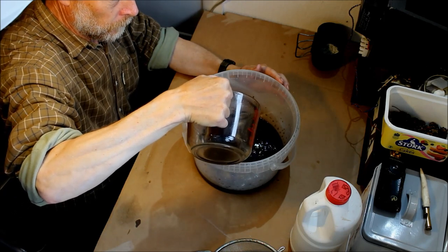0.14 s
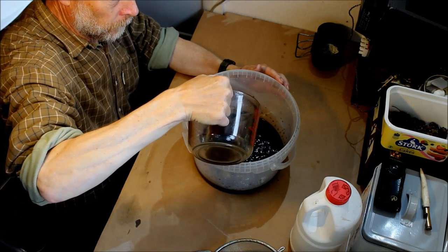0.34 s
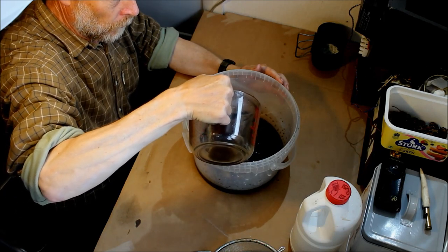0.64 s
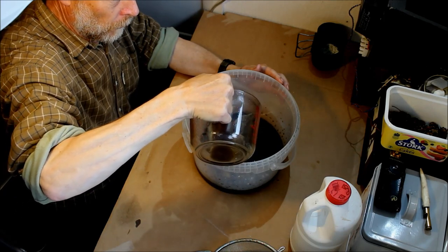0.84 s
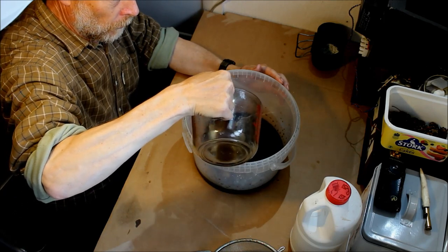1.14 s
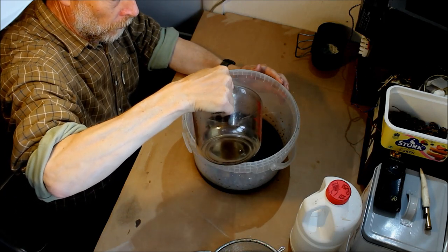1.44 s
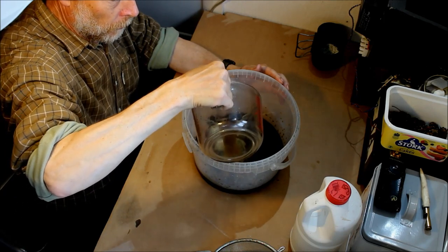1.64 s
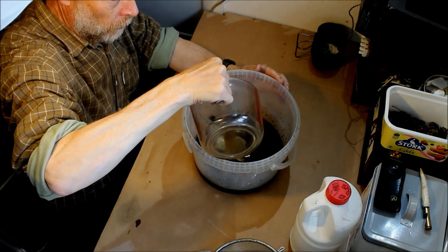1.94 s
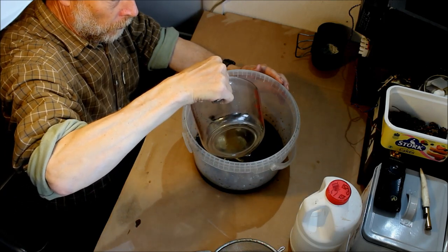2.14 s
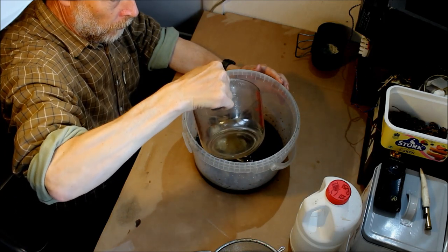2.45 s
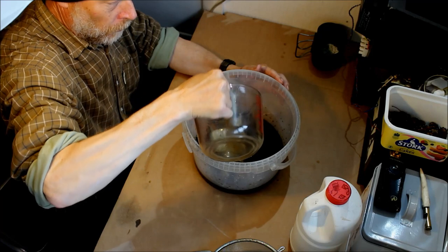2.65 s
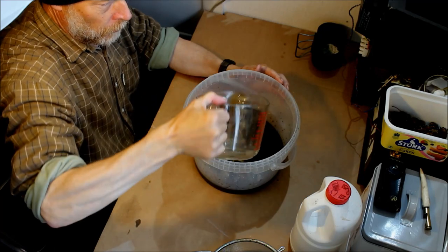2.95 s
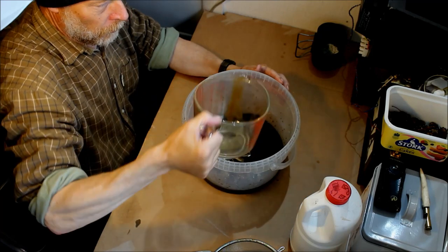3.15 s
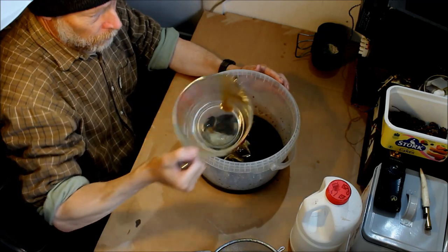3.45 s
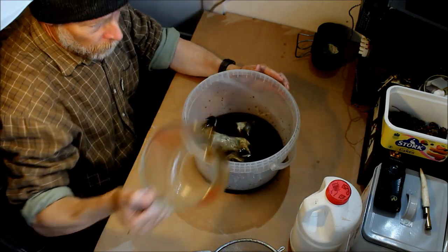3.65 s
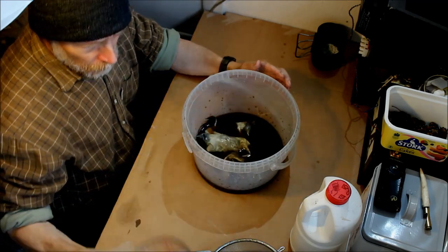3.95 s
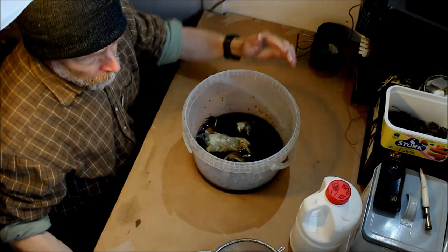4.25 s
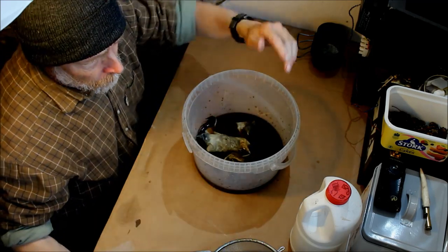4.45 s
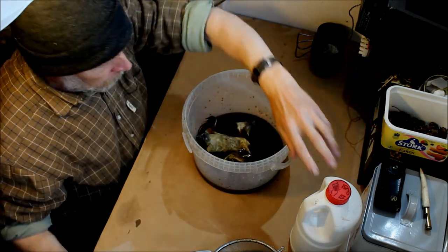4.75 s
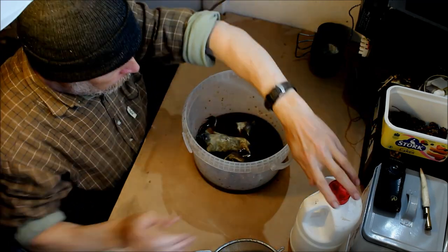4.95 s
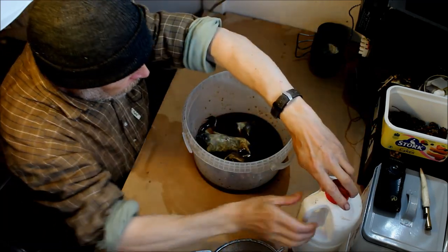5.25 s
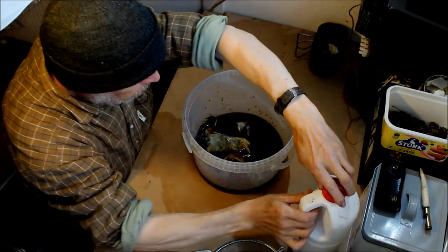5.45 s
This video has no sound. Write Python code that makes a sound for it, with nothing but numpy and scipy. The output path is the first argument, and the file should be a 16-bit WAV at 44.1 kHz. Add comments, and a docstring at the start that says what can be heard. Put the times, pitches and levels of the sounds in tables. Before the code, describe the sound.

Liquid splashes from a glass jug into a plastic bucket and thins to drips, followed by knocks on a workbench.

```python
"""A workbench in a small room. Liquid runs from a glass jug into a plastic bucket: a stream of ringing
bubbles that thins to single drips. The jug knocks the bucket, a hand slides off it, and the jug is set
down and sings; the bench rings low and sways. Fingers rub and tap a plastic bottle. Steady hiss and a
throbbing hum lie behind, all heard through a camera microphone with gain control."""
import sys
import numpy as np
from scipy import signal
from scipy.fft import rfft, irfft
from scipy.io import wavfile
from scipy.ndimage import uniform_filter1d

SR = 44100
rng = np.random.default_rng(int(sys.argv[2]) if len(sys.argv) > 2 else 0)


def transcribe(u):
    """Save the signal u as a 16-bit wav file named by the first command-line argument.

    u: samples, shape (n,) or (channels, n), limited to [-1, 1]; the rate is SR.
    q: integer samples, one column per channel.
    """
    v = np.clip(np.atleast_2d(u).T, -1, 1)
    q = np.round(v * 32767).astype(np.int16)
    wavfile.write(sys.argv[1], SR, q)


N = 247401


def amp(db):
    """Gain of a level in dB."""
    return 10 ** (np.asarray(db) / 20)


def unit_rms(x):
    """Scaled to rms 1."""
    return x / np.sqrt(np.mean(x ** 2) + 1e-20)


def add(mix, start_s, sound):
    """Mixes a sound in at start_s."""
    part = mix[round(start_s * SR):][:len(sound)]
    part += sound[:len(part)]


def butter(x, order, edges_hz, kind):
    """Causal Butterworth filter."""
    return signal.sosfilt(signal.butter(order, edges_hz, kind, fs=SR, output="sos"), x)


def resonate(x, hz, width_hz):
    """Resonator, peak gain 1."""
    pole = np.exp((2j * np.pi * hz - np.pi * width_hz) / SR)
    return 2 * signal.lfilter([1 - abs(pole)], [1, -pole], x).real


def coloured(x, spectrum):
    """Shaped by (f/Hz, level/dB) points on a log-frequency axis, rms 1."""
    hz, db = np.transpose(spectrum)
    bins_hz = np.fft.rfftfreq(len(x), 1 / SR)
    gain = amp(np.interp(np.log(bins_hz + 1), np.log(hz), db))
    return unit_rms(irfft(rfft(x) * gain, len(x)))


def mode(t, hz, db, t60_s):
    """Damped sine."""
    return amp(db - 60 * t / t60_s) * np.sin(2 * np.pi * hz * t)


def burst(noise, lo_hz, hi_hz, t60_s, rise_s):
    """Band noise with a fast rise and exponential decay."""
    t = np.arange(len(noise)) / SR
    band = unit_rms(butter(noise, 2, [lo_hz, hi_hz], "band"))
    return band * (1 - np.exp(-t / rise_s)) * amp(-60 * t / t60_s)


def echoes(x, t60_s, delay_s, step=20):
    """Decaying reflections of random sign, one per step samples; response energy 1."""
    slots = np.arange(round(delay_s * SR), SR // 2, step)
    response = np.zeros(SR // 2 + step)
    response[slots + rng.integers(0, step, len(slots))] = rng.choice([-1., 1.], len(slots))
    response *= amp(-60 * np.arange(len(response)) / SR / t60_s)
    return signal.oaconvolve(x, response / np.linalg.norm(response))[:N]


def bubble(hz, decay_cycles, glide=0.041):
    """Trapped air rings up fast, then dies as its pitch climbs; peak 1."""
    age = np.arange(int(5 * decay_cycles * SR / hz)) * hz / SR / decay_cycles
    envelope = (1 - np.exp(-age / 0.16)) * np.exp(-age)
    tone = envelope * np.sin(2 * np.pi * decay_cycles * (age + glide * age ** 2 / 2))
    return tone / abs(tone).max()


def bubble_string(hz, decay_cycles, jitter, gap_s=0.0025):
    """A weak first bubble, the main one, then fainter ones near the same size."""
    out = np.zeros(SR // 20)
    for k, (db, (shift, detune, swell)) in enumerate(zip([-12, -5, -10, -15, -20], jitter)):
        tone = bubble(hz * (1 + 0.1 * detune), decay_cycles)
        add(out, gap_s * (k + 0.4625 + 0.4 * shift), amp(db + 0.51 * swell) * tone)
    return out


# Pour: t/s, flow/dB, large bubbles re flow/dB
FLOW = [(0.0, -34.5, -10.5), (0.3, -35.5, -4), (0.5, -34.5, -4), (0.65, -30, -9), (0.9, -35.5, -5.5),
        (1.13, -35, -9.5), (1.25, -35.5, -15), (1.4, -45, -12), (1.59, -56.5, -6), (1.78, -45.5, -28),
        (2.04, -63, 11), (2.3, -77, 4)]
# Large bubbles, small bubbles, spray: f_lo/Hz, f_hi/Hz, rate/(1/s), decay/cycles, spread/dB
BUBBLE_SIZES = [(950, 1660, 1100, 3.3, 4), (2286, 7400, 5000, 3.6, 5.5), (6800, 13250, 2200, 4.3, 5.5)]
def stream(pitches=14):
    """Random bubbles in three size classes, a few loud; the spray thins more slowly than the flow."""
    times_s, flow_db, large_db = np.transpose(FLOW)
    levels_db = flow_db + large_db, flow_db, -10.5 + 0.67 * flow_db
    out, t = np.zeros(N), np.arange(round(times_s[-1] * SR)) / SR
    for db, (lo_hz, hi_hz, per_s, decay_cycles, spread_db) in zip(levels_db, BUBBLE_SIZES):
        chance, pitch, strength = rng.random((3, len(t)))
        births = (chance < per_s / SR) * amp(spread_db * np.minimum(-np.log(strength), 4.5))
        pitch_index = (pitch * pitches).astype(int)
        layer = sum(signal.oaconvolve(births * (pitch_index == k), bubble(hz, decay_cycles))[:len(t)]
                    for k, hz in enumerate(np.geomspace(lo_hz, hi_hz, pitches)))
        add(out, 0, unit_rms(layer) * amp(np.interp(t, times_s, db)))
    return out


# Loud drops: t/s, level/dB, bubble f/Hz, spray re level/dB, splash re level/dB, decay/cycles
DROPS = [(0.0094, -10, 6050, -20, -8, 3.2), (0.0524, -16, 4960, -16, -10, 4.6),
         (0.0615, 4.5, 5100, -22, -11, 5.4), (0.092, -17, 3208, -24, -8, 4.2),
         (0.1185, -2, 4490, -34, -9, 3), (0.1361, -7.5, 2540, -18, 1, 3.2),
         (0.1424, -7.5, 8600, -6.5, -5, 3.6), (0.1644, -16, 3430, -6, -8, 3.9),
         (0.188, -12.5, 5340, -25, -11, 4.2), (0.207, -8.5, 3100, -13, 4.5, 2.5),
         (0.2269, -11, 5760, -17, -12, 4.7), (0.2544, -25, 3190, 0, -8, 4.17),
         (0.2747, -9.5, 6000, -14, -14, 4.9), (0.3012, -10.5, 4700, -12, -2, 3.7),
         (0.3314, -4, 10800, -25, -12, 4.2), (0.3496, -9, 3460, -10.5, -7, 4.2),
         (0.3935, -12, 6230, -20, -8, 4.2), (0.405, -16, 3260, -1, -3, 3.6),
         (0.4212, -12, 2640, -9, 2.5, 3.9), (0.4394, -10.5, 2520, -9, -4, 3.7),
         (0.4733, -16.5, 3320, -20, 9, 3.18), (0.4954, -7.5, 5800, -17, -11, 4.2),
         (0.5172, -1, 5330, -33, -10, 6.1), (0.547, -15, 3760, -11, -10, 4.2),
         (0.5563, -4.5, 7700, -15, -10, 6.1), (0.596, -16, 5800, -11, -11, 3.8),
         (0.6017, -13, 4900, -21, -8, 4.2), (0.6182, -10, 6200, -9, -8, 5.2),
         (0.6382, -2, 5820, -10, -3, 4.2), (0.6668, -1.5, 6404, -28, -17, 4.8),
         (0.684, -10, 7240, -24, -6, 4.2), (0.7023, -14.5, 3240, -22, -1, 4.2),
         (0.725, -12.5, 6660, -18, -12, 5), (0.755, -13, 3240, -9, -15, 4),
         (0.7624, -15, 3770, -18, -11, 4.2), (0.7891, -5, 5980, -21, -8, 7.3),
         (0.823, -10, 4830, -19, -8, 3.2), (0.832, -9, 3600, -15, 0, 3.4),
         (0.8724, -14.5, 3480, -7, -6, 4.2), (0.8799, -13.5, 3700, -3, -15, 5.1),
         (0.8969, -6.5, 3200, -10, -6, 4.6), (0.922, -12, 6000, -6, -5, 3.8),
         (0.94, -3.5, 6000, -24, 6, 3.5), (0.9685, -4, 4280, -17, -17, 5.7),
         (0.9941, -11, 2640, -14, -8, 3.7), (1.029, -26, 5990, 0, -14, 4.2),
         (1.066, -5, 5870, -12, -11, 3.8), (1.089, -11, 5900, -9, -10, 3.7),
         (1.1014, -8, 5980, -13.5, 1, 3.8), (1.1286, -12.5, 5700, -22, 6, 3.9),
         (1.1747, 5.5, 5980, -43, -12, 3.6), (1.243, -8, 6300, -10, -13, 5),
         (1.2866, -13, 5270, -16, -13, 4.2), (1.3177, -9, 4000, -22, -1.5, 3.4),
         (1.3218, -6.5, 5830, -33, -14, 5.6), (1.3745, -7, 8300, -20, -10, 4.9),
         (1.406, -15, 5900, -24, -5, 4.9), (1.4556, -19, 3100, -28, -12, 4.2),
         (1.5303, -13, 3770, -24, -5, 4.2), (1.5614, -27.5, 3740, -5, -8, 4.2),
         (1.595, -12, 4570, -13, -3, 3.7), (1.6057, -12.5, 5370, -16, -8, 4.7),
         (1.6474, -17, 6200, -12, -8, 4.2), (1.6546, -11, 5980, -15, 7.5, 2.2),
         (1.684, -10, 10300, -18, -8, 4.7), (1.713, -17.5, 5750, -9.5, 9.5, 3),
         (1.748, -9, 5980, -25, -16, 4.2), (1.7651, -2, 5980, -15, -26, 4.9),
         (1.7998, -4.5, 9800, -20, -17, 4.2), (1.8244, -14, 3770, -10, -14, 5),
         (1.8432, -7.5, 7660, -21, -9, 5.7), (1.8722, -6, 5980, -15.5, -14, 3.6),
         (1.922, -17.5, 3360, -8.5, -1, 4.2), (1.943, -22, 9790, -12, -8, 4.2),
         (1.9944, -12, 3770, -17.5, -2, 4.4), (2.0334, -24.5, 7610, -17, -10, 5.1),
         (2.0604, -33, 6260, -7, -8, 4.2), (2.0812, -26, 5800, -10, -8, 3.5),
         (2.1001, -22, 6020, -13, -2, 4.8), (2.1652, -32.5, 2500, -15, -13, 4.2),
         (2.1966, -27, 9380, -19, -8, 5.1), (2.2583, -25, 6100, -17, -17, 5.5),
         (2.3906, -33, 5430, -5.5, -10, 4.2), (2.4858, -8, 10200, -27, -11.5, 6.3)]
def drops():
    """Each drop traps a string of bubbles, with a broad splash and a fine spray."""
    out = np.zeros(N)
    noises = rng.standard_normal((len(DROPS), 2, 2500))
    jitters = rng.uniform(-1, 1, (len(DROPS), 5, 3))
    for (at_s, db, hz, spray_db, splash_db, decay_cycles), noise, jitter in zip(DROPS, noises, jitters):
        splash = burst(noise[0], 0.53 * hz, 1.72 * hz, t60_s=0.018, rise_s=0.0046)
        spray = burst(noise[1], 6000, 12400, t60_s=0.036, rise_s=0.00033)
        add(out, at_s - 0.002, amp(db) * bubble_string(hz, decay_cycles, jitter))
        add(out, at_s, amp(db + splash_db) * splash + amp(db + spray_db) * spray)
    return out


# Large air pockets: t/s, level/dB, f/Hz
GULPS = [(0.043, -17, 1790), (0.09, -19, 2510), (0.118, -23, 1390), (0.136, -16, 2540),
         (0.205, -15.5, 1200), (0.238, -20, 1450), (0.273, -21, 1221), (0.344, -13, 1210),
         (0.378, -14, 1580), (0.422, -26, 2510), (0.441, -29, 2542), (0.475, -24, 2540),
         (0.496, -15.5, 1080), (0.547, -19, 1230), (0.594, -23, 2510), (0.676, -17.5, 1210),
         (0.729, -19.5, 1370), (0.767, -21, 1440), (0.794, -20, 1450), (0.856, -19, 2510),
         (0.887, -17, 1320), (0.917, -19, 1250), (0.932, -21, 1450), (0.95, -11.5, 2510), (0.97, -5, 2610),
         (0.995, -31, 2574), (1.032, -31, 1100), (1.121, -22, 1200), (1.151, -18, 1140),
         (1.244, -15.5, 2510), (1.313, -21.5, 2190), (1.596, -22, 2530), (1.713, -22, 2450),
         (1.734, -23, 2420), (1.813, -30.5, 1060), (1.993, -25, 1440)]
def gulps(decay_cycles=3.14, plop_db=4, plop_db_per_khz=-6.11):
    """Each pocket breaks into low bubbles with a dull plop; smaller, higher ones plop less."""
    out = np.zeros(N)
    noises = rng.standard_normal((len(GULPS), 2500))
    jitters = rng.uniform(-1, 1, (len(GULPS), 5, 3))
    for (at_s, db, hz), noise, jitter in zip(GULPS, noises, jitters):
        plop = burst(noise, 770, 1730, t60_s=0.043, rise_s=0.0029)
        add(out, at_s - 0.002, amp(db) * bubble_string(hz, decay_cycles, jitter))
        add(out, at_s, amp(db + plop_db + plop_db_per_khz * hz / 1000) * plop)
    return out


def drumming():
    """The stream drums softly on the bucket's bottom, following the flow."""
    times_s, flow_db, _ = np.transpose(FLOW)
    drive_db = np.interp(np.arange(N) / SR, times_s, flow_db, right=-200)
    murmur = unit_rms(butter(rng.standard_normal(N), 2, [90, 600], "band"))
    return murmur * amp(-39 + 0.36 * drive_db)


# Bucket air and wall resonances: f/Hz, width/Hz, gain/dB
BUCKET_MODES = [(954, 15.3, 5.5), (1200, 160, -7.5), (1440, 41, 0), (2510, 87, -2.5), (3226, 27, 5.5),
                (3770, 230, -5.5), (4900, 1090, -1.5), (5980, 306, 2), (7250, 20, -48), (8300, 59, -9)]
def bucket(liquid):
    """The walls reflect each splash and the resonances hold it; little escapes below the lowest."""
    inside = liquid + amp(-5.5) * echoes(liquid, t60_s=0.07, delay_s=0.002)
    ringing = sum(amp(db) * resonate(inside, hz, width_hz) for hz, width_hz, db in BUCKET_MODES)
    return butter(0.47 * inside + ringing, 6, 870, "high")


# Modes of bench and bucket, grouped as thud, board, bucket wall, tick: f/Hz, level/dB, t60/s
BENCH_MODES = [
    [(79, -22, 0.5), (116.3, 7.5, 0.083)],
    [(170.5, -3.5, 0.19), (223, -8.5, 0.13), (250.6, -3, 0.23), (254, -7.5, 0.086)],
    [(75.3, -12, 0.61), (289, 7, 0.035), (318.7, -8.5, 0.23), (578, -13, 0.044), (655, -1.5, 0.036),
     (948, -5.5, 0.048), (1035, 7, 0.014)],
    [(1433, 2, 0.027), (1526, -5.5, 0.025), (1910, -16, 0.032)],
]
# Contacts: t/s, thud/dB, board/dB, wall/dB, tick/dB, crack/dB, crack f/Hz, crack t60/s
KNOCKS = [(2.8963, -43, -8.5, -10, -21, -13, 2550, 0.053), (2.9157, -27, -8.5, -2.5, -11, -16, 3400, 0.027),
          (4.2380, -60, -50, -42, -47, -32.5, 5560, 0.081),
          (4.4768, -9.5, -3, -15.5, -7.5, -16.5, 3500, 0.078),
          (4.6190, -12, -5, -15, -11, -23.5, 2920, 0.17), (4.6875, -40, -44, -34, -39, -21, 4630, 0.17),
          (4.6917, -43, -38, -13.5, -14, -12.5, 4670, 0.052),
          (4.6945, 0.5, -15.5, -36, -46, -40, 4000, .05), (4.7273, -46, -46, -22, -22, -4, 8600, 0.026),
          (4.7297, -47, -42, -41, -49, -5, 8400, 0.036), (4.759, -38, -53, -51, -45, -21, 6360, .12),
          (4.836, -34, -35, -58, -56, -28.5, 10000, 0.029), (5.259, -58, -57, -56, -54, -35.5, 3240, 0.065),
          (5.3190, -27, -50, -51, -38, -36, 3950, 0.15), (5.3427, -49, -38, -36, -43, -14, 3700, 0.059),
          (5.355, -24, -38, -32.5, -28, -29, 4500, 0.094)]
def knocks():
    """Each hard contact cracks and rings the four mode groups."""
    out, t = np.zeros(N), np.arange(SR // 2) / SR
    rings = [sum(mode(t, hz, db, t60_s) * (1 - np.exp(-t * hz / 0.41)) for hz, db, t60_s in group)
             for group in BENCH_MODES]
    rings[1:] = butter(rings[1:], 2, 110, "high")  # a short contact hardly moves the whole bench
    for at_s, *groups_db, crack_db, crack_hz, t60_s in KNOCKS:
        noise = rng.standard_normal(6000)
        crack = burst(noise, 0.48 * crack_hz, 1.46 * crack_hz, t60_s, rise_s=2.2 / crack_hz)
        add(out, at_s, sum(amp(db) * ring for db, ring in zip(groups_db, rings)))
        add(out, at_s, amp(crack_db) * crack)
    return out


def jug(at_s=4.778):
    """The glass sings one thin tone after it is set down."""
    out, t = np.zeros(N), np.arange(SR // 2) / SR
    add(out, at_s, mode(t, hz=1433, db=-33, t60_s=1.1) * signal.windows.tukey(len(t), 0.05))
    return out


# Bench swings under the microphone: t/s, length/s, level/dB, f/Hz
SWINGS = [(2.94, 0.23, -33, 45), (3.156, .1, -46, 45.3), (4.493, 0.14, -28, 35), (4.712, 0.14, -15, 41),
          (4.822, 0.1, -19.5, 41), (4.959, 0.069, -30, 41.3), (5.034, 0.12, -26.5, 41.6),
          (5.127, 0.18, -34, 43), (5.39, .14, -48, 41)]
def bench_sway(rise_share=0.36, fall_share=0.34, fade_db=-9):
    """Each swing is a deep tone that swells, fades and stops, over uneven rocking."""
    out = np.zeros(N)
    for at_s, length_s, db, hz in SWINGS:
        t = np.arange(0, length_s, 1 / SR)
        progress = t / length_s
        ramp = np.clip(np.minimum(progress / rise_share, (1 - progress) / fall_share), 0, 1)
        envelope = np.sin(np.pi / 2 * ramp) ** 2 * amp(db + fade_db * progress)
        rocking = unit_rms(resonate(rng.standard_normal(len(t)), hz=31.7, width_hz=4.9))
        add(out, at_s, np.sqrt(2) * envelope * (np.sin(2 * np.pi * hz * t) + 0.27 * rocking))
    return out


# Envelope per stroke: t/s, level/dB
RUB_STROKES = [
    [(4.775, -33), (4.83, -42.5), (4.87, -52)],
    [(4.9, -56), (5.25, -51.5), (5.31, -54)],
    [(5.375, -32.5), (5.411, -36), (5.451, -30), (5.529, -37), (5.557, -36), (5.585, -22), (5.61, -33)],
]
# Spectrum per stroke: f/Hz, relative density/dB
RUB_SPECTRA = [
    [(880, -34), (1500, -1), (2140, -22), (2340, -6), (3780, -6), (5350, 1), (15000, -31)],
    [(350, -29), (600, -5), (715, -18), (818, -3), (887, -3), (4340, 0), (15000, -20)],
    [(180, -47), (300, -15), (523, -2.5), (587, -10), (658, -4.5), (1150, -6.5), (1290, -10.5), (3920, -6),
     (15000, -26)],
]
def bottle_rubs(spread_db=2):
    """Fingers make dense tiny slips of uneven size, coloured by the surface."""
    out = np.zeros(N)
    for stroke, spectrum in zip(RUB_STROKES, RUB_SPECTRA):
        times_s, db = np.transpose(stroke)
        t = np.arange(times_s[0], times_s[-1], 1 / SR)
        friction = rng.standard_normal(len(t))
        roughness = unit_rms(uniform_filter1d(rng.standard_normal(len(t)), 60))
        slips = coloured(friction * amp(spread_db * roughness), spectrum)
        add(out, times_s[0], slips * amp(np.interp(t, times_s, db)))
    return out


# Plastic bottle modes: f/Hz, level/dB, t60/s
BOTTLE_MODES = [(122.4, -7, 0.5), (159, 0, 0.061), (502, -8.5, 0.25), (742, -6.5, 0.057),
                (1100, -14, 0.058), (3030, -23, 0.029), (3650, -7, 0.025), (4100, -7, 0.027),
                (5670, -10, 0.038)]
# Finger taps: t/s, level/dB
TAPS = [(5.26, -59), (5.3192, -31), (5.3445, -20), (5.3572, -14.5)]
def bottle_taps():
    """Each tap rings the hollow bottle; the modes alternate in sign."""
    out, t = np.zeros(N), np.arange(SR // 4) / SR
    ring = sum((-1) ** k * mode(t, hz, db, t60_s) for k, (hz, db, t60_s) in enumerate(BOTTLE_MODES))
    for at_s, db in TAPS:
        add(out, at_s, amp(db) * ring)
    return out


# Slide envelope: t/s, level/dB
SLIDE = [(4.001, -55), (4.092, -54.5), (4.294, -43), (4.42, -40.5), (4.538, -37), (4.62, -44)]
# Rubbed wall resonances: f/Hz, width/Hz, relative level/dB
WALL_MODES = [(1210, 44, 3.5), (1450, 52, -11), (1480, 1600, 2), (2190, 67, -12), (2510, 69, -8),
              (2830, 74, -23)]
def hand_slide():
    """Soft friction of a hand, sounding through the bucket's wall."""
    out = np.zeros(N)
    times_s, slide_db = np.transpose(SLIDE)
    t = np.arange(times_s[0], times_s[-1], 1 / SR)
    friction = rng.standard_normal(len(t))
    wall = sum(amp(db) * unit_rms(resonate(friction, hz, width_hz)) for hz, width_hz, db in WALL_MODES)
    add(out, times_s[0], unit_rms(wall) * amp(np.interp(t, times_s, slide_db)))
    return out


def room(x):
    """Short tail; thin walls let the bass out and absorb the top."""
    return amp(-11) * butter(echoes(x, t60_s=0.18, delay_s=0.006), 2, [280, 8000], "band")


# Room hiss: f/Hz, relative density/dB
HISS_SPECTRUM = [(12, -39), (20, -8), (38, -10.5), (98, -6), (221, -8), (261, -8), (355, -12), (396, -3),
                 (456, -24.5), (510, -10), (1020, -18), (1600, -19), (3040, -23.5), (4250, -23.5),
                 (15800, -30)]
def background(throb_hz=11.5, rumble_hz=48, rumble_width_hz=17):
    """A fuzzy throbbing hum, low rumble and steady hiss."""
    throb = (1 + np.cos(2 * np.pi * throb_hz * np.arange(N) / SR + 3.77)) ** 2
    hum = unit_rms(throb * resonate(rng.standard_normal(N), hz=396.5, width_hz=53))
    low_noise = resonate(rng.standard_normal(N), rumble_hz, rumble_width_hz)
    rumble = unit_rms(resonate(low_noise, rumble_hz, rumble_width_hz))
    hiss = coloured(rng.standard_normal(N), HISS_SPECTRUM)
    return amp(-42.5) * hiss + amp(-52.5) * hum + amp(-62.5) * rumble


def scene():
    """Pour and handling with the room's tail, over drumming, sway and background; mono."""
    pour = bucket(stream() + drops() + gulps())
    near = pour + knocks() + bottle_rubs() + hand_slide() + bottle_taps()
    glass = jug()
    tail = room(near + 0.5 * glass)
    return (near + glass + tail + drumming() + bench_sway() + background())[None]


def record(dry, threshold_db=-17, slope=0.46, release_db_per_s=79, cutoff_hz=15945):
    """Gain control dips on loud knocks, peaks clip, then the band limit."""
    power_db = 10 * np.log10(abs(uniform_filter1d(dry[0] ** 2, 1200, origin=500)) + 1e-12)
    release_db = np.arange(N) * release_db_per_s / SR
    held_db = np.maximum.accumulate(power_db + release_db) - release_db
    over_db = uniform_filter1d(np.maximum(held_db - threshold_db, 0), 400)
    clipped = np.clip(dry * amp(-slope * over_db), -0.95, 0.95)
    lowpass = signal.firwin(2047, cutoff_hz, window=("kaiser", 9), fs=SR)
    return signal.oaconvolve(clipped, lowpass[None], "same")


dry = scene()
out = record(dry)
transcribe(out)
```